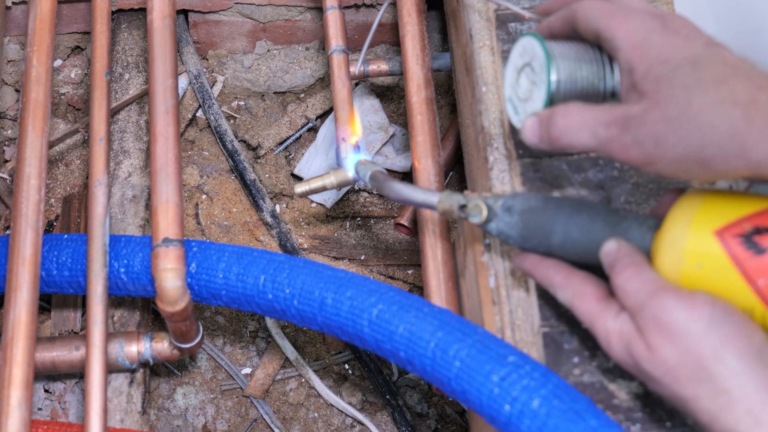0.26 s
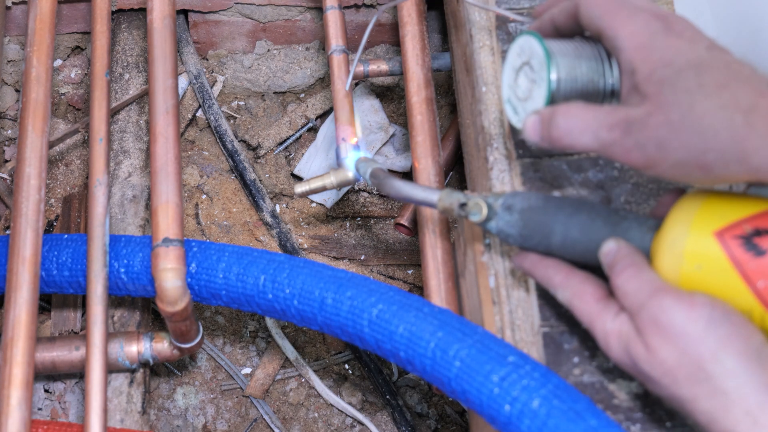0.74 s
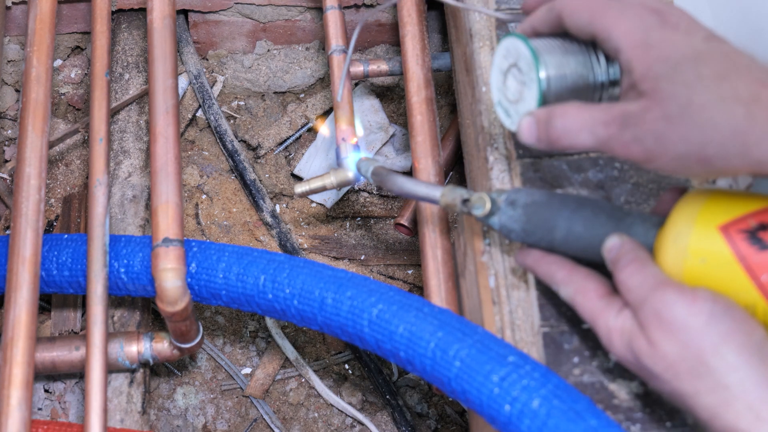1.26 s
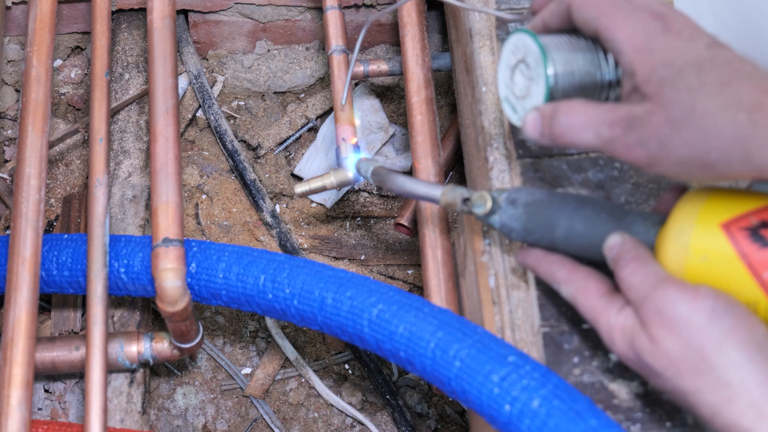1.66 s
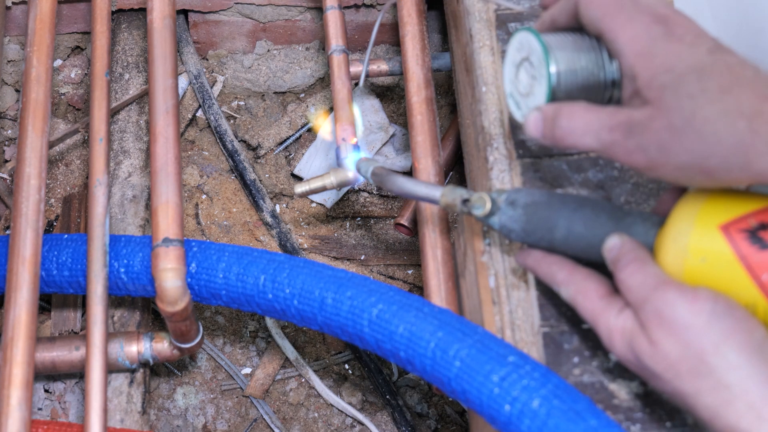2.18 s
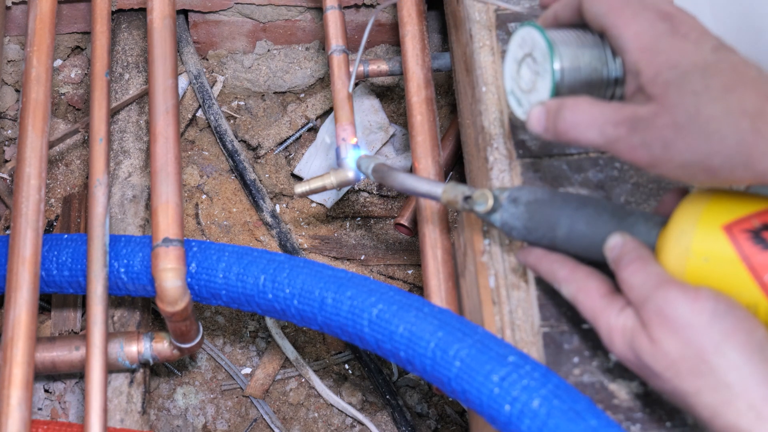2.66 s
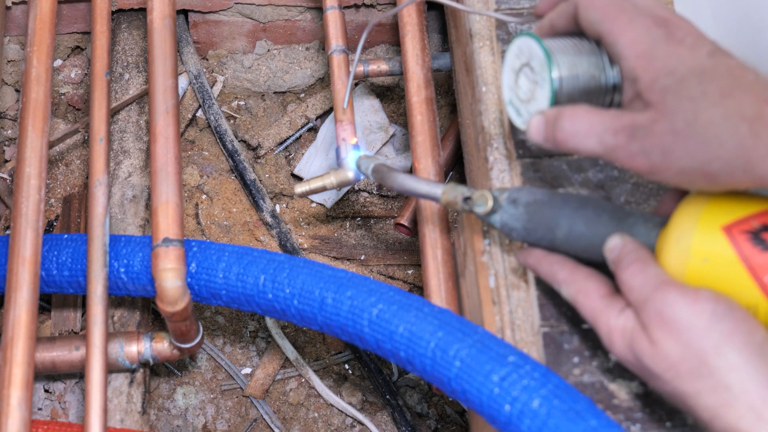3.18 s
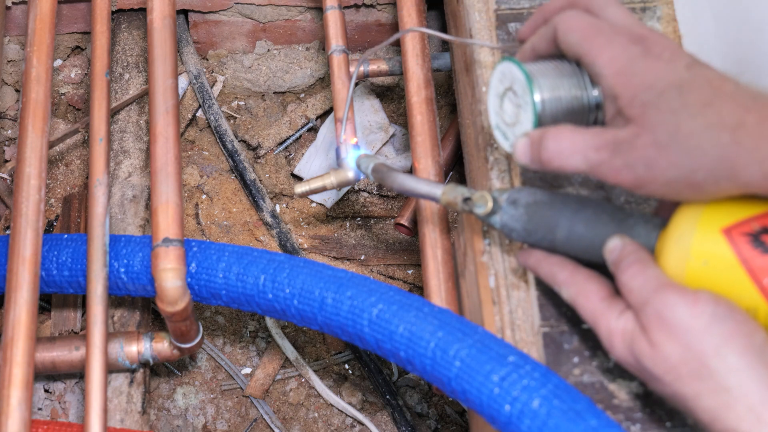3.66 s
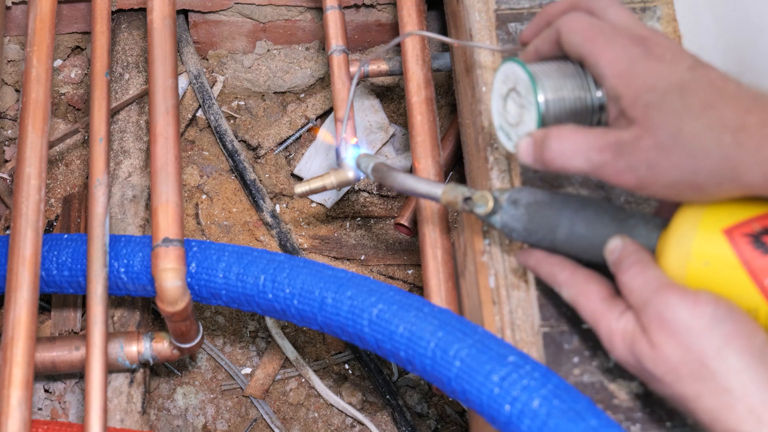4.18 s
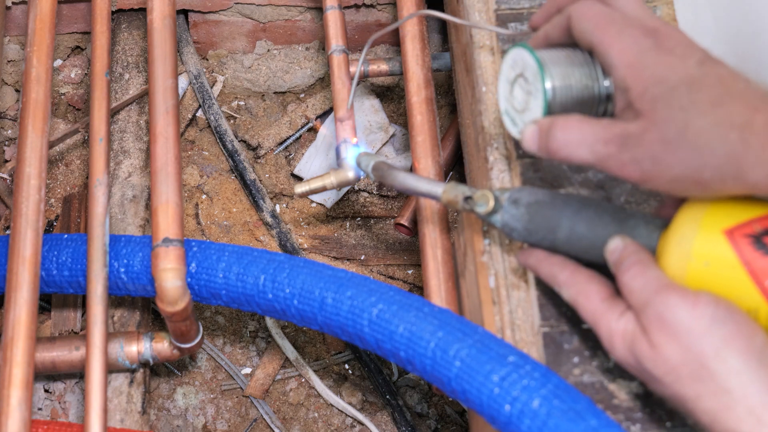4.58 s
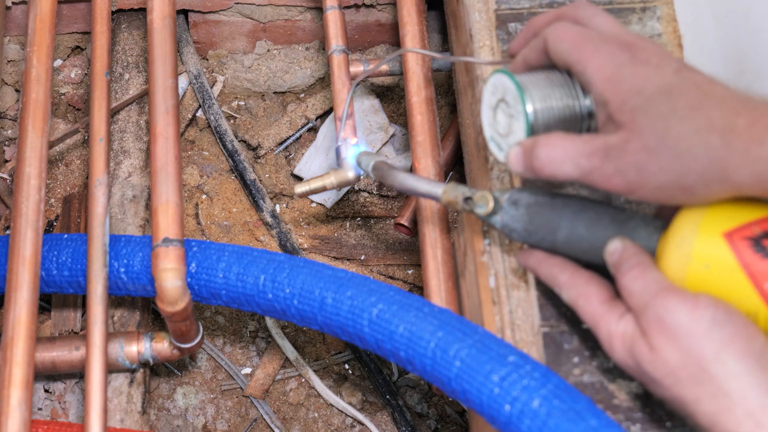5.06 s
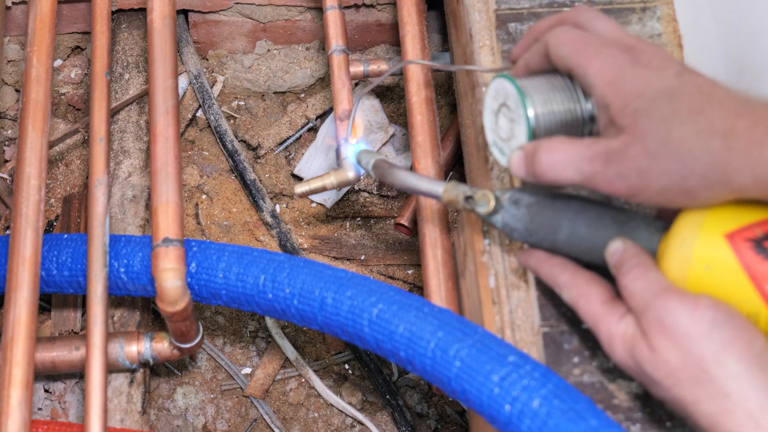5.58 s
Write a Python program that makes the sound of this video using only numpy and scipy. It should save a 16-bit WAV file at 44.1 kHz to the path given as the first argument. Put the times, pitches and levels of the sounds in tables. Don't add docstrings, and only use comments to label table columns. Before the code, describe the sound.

A handheld gas torch roars steadily up close, a breathy hissing burn with a wavering, fluttering whistle-like note buried inside it.

```python
import sys
import numpy as np
from scipy import signal
from scipy.fft import rfft, irfft, next_fast_len
from scipy.io import wavfile
from scipy.ndimage import uniform_filter1d, map_coordinates

SR = 44100
rng = np.random.default_rng(int(sys.argv[2]) if len(sys.argv) > 2 else 0)


def undo_db(level):
    steps = np.asarray(level, float) / 20
    return 10 ** steps


def transcribe(u):
    v = np.clip(np.atleast_2d(u).T, -1, 1)
    q = np.round(v * 32767).astype(np.int16)
    wavfile.write(sys.argv[1], SR, q)


N = 257103


def unit(x):
    return x / np.sqrt(np.mean(x ** 2) + 1e-20)


def along(points, hz):
    point_hz, value = np.transpose(points)
    return np.interp(np.log(hz + 1), np.log(point_hz + 1), value)


def curves(rows):
    time_s, *columns = np.transpose(rows)
    return [np.interp(np.arange(N) / SR, time_s, column) for column in columns]


def bumps(rows, rise_s, fall_s):
    t = np.arange(N) / SR
    total = np.zeros(N)
    for peak_s, size in rows:
        side_s = np.where(t < peak_s, rise_s, fall_s)
        total += size * np.exp(-((t - peak_s) / side_s) ** 2)
    return total


def wobble(rate):
    knots = rng.standard_normal(int(N * 400 / SR))
    position = np.arange(N) * min(rate, 390) / SR
    return unit(map_coordinates(knots, [position]))


def flutter(rate):
    shake = wobble(rate)
    return unit(shake - uniform_filter1d(shake, size=int(0.048 * SR)))


def filtered(x, response):
    m = next_fast_len(N + SR // 2)
    return irfft(rfft(x, m) * response(np.fft.rfftfreq(m, 1 / SR)), m)[:N]


def bands(rows, share=1):
    def response(hz):
        gain = np.ones(len(hz), complex)
        for centre, width, db in rows:
            off = centre ** 2 - hz ** 2
            root = undo_db(share * db / 2)
            gain *= (off + 1j * hz * width * root) / (off + 1j * hz * width / root)
        return gain
    return response


# (frequency [Hz], level [dB])
ROOM_TAIL = [(3000, -40), (5000, -19), (8000, -12), (16000, -12)]


def room(x, t60=0.12):
    t = np.arange(SR // 4) / SR
    tail = rng.standard_normal(len(t)) * undo_db(-60 * t / t60) * (t > .012)
    late = signal.fftconvolve(x, tail / np.linalg.norm(tail))[:N]
    return x + filtered(late, lambda hz: undo_db(along(ROOM_TAIL, hz)))


# (centre [Hz], width [Hz], gain [dB])
CAVITY_ECHOES = [(198, 83, -17.5), (227.7, 124, 15), (412.4, 111, -23), (482.4, 130, 19.5), (491, 484, 7.5),
                 (518.7, 80.5, -17), (627.4, 60.4, 20.5), (648, 90.3, -25), (765, 54, -6.5), (812, 31, 6.5),
                 (892, 60, 6.5), (1017, 24, -6.5), (1056, 22, 6.5), (1124, 65, -6.5), (1194, 28.5, -15.5),
                 (1219.4, 85, 9.5), (1255, 20.4, -11), (1289, 27, 3.5), (1343, 26, 1.4), (1389, 24, -5.5),
                 (1410, 15, 2.5), (1482, 26, -6.5), (1715, 41, -16), (1732, 44, 11.5), (1831, 67, 8),
                 (1943, 109, -25.0), (1962, 102, 17.5),
                 (2134, 107, -13.9), (2177, 130, 20.0), (2235, 110, -19.8), (2413, 60, 7.0),
                    (2688, 67, 5.2), (2819, 56, 4.4), (2890, 80, -7.3), (2929, 191, 11.2),
                    (3059, 117, -11.9), (3342, 44, 6.1), (3581, 27, -8.3), (3682, 164, 20.0),
                    (3732, 220, -18.9), (3870, 31, -6.2), (3952, 37, 5.7), (3999, 35, -6.8),
                    (4140, 45, 6.2), (4283, 57, 6.5), (4459, 95, 8.3), (4638, 216, -25.0),
                    (4702, 288, 18.4), (5033, 62, -10.4), (5156, 67, -10.8), (5266, 613, 15.7),
                    (5318, 96, -16.9), (5612, 326, -11.4), (5970, 51, 5.5), (6023, 116, -18.4),
                    (6060, 411, 14.7), (6273, 52, -7.8),
                 (6694, 534, -15.1), (6855, 387, 11.1), (7125, 87, 6.1), (7445, 108, -5.4),
                 (7539, 266, 9.5), (8164, 102, -6.8), (8190, 233, 4.6), (8522, 172, -7.5), (8752, 64, -5.6),
                 (9135, 100, -9.0), (9397, 900, 15.4), (9566, 555, -19.7), (10096, 159, -8.2),
                 (10569, 204, -11.2), (10756, 900, 17.6), (10983, 662, -19.1), (11134, 195, 10.3),
                 (11421, 111, -3.8), (12092, 239, -8.4), (12104, 108, 10.4), (12331, 102, 3.3),
                 (12648, 63, -7.1), (12876, 293, 11.4), (12982, 306, -11.1), (13441, 120, 4.8),
                 (13725, 275, -6.2), (14052, 49, -3.3), (14670, 614, 20.0), (14766, 442, -17.2),
                 (15449, 172, -4.7)]
# (centre [Hz], width [Hz], gain
# [dB])
NARROW_ECHOES = [(933, 15, -3.4), (1316, 18, -2.8), (1632, 20, -2.8), (1874, 15, -3.1), (2017, 15, 2.9),
                 (2136, 15, -3.5), (2222, 15, -4.3), (2275, 29, -9.3), (2285, 66, 6.9), (2324, 25, -5.1),
                 (2469, 15, -4.6), (2534, 15, -9.9), (2580, 74, 3.5), (2639, 16, -6.1), (3046, 15, -3.1),
                 (3257, 74, 6.1), (3262, 32, -12.7), (3407, 15, -7.3), (3579, 15, -3.3), (3728, 15, -4.9),
                 (3792, 31, -11.6), (3796, 74, 7.3), (3861, 15, -5.1), (4214, 16, -6.1), (4365, 15, -5.2),
                 (4854, 15, -2.5),
                 (5551, 31, -8.0), (5614, 104, 10.0), (5628, 36, -14.0), (5764, 21, -4.7), (6231, 104, 4.0),
               (6390, 20, -8.7), (6638, 25, -5.3), (6938, 40, -6.6), (7003, 98, 6.2), (7039, 44, -8.1),
               (7814, 76, -6.5), (7869, 104, 10.0), (7952, 104, -11.1), (8008, 60, 7.7), (8393, 15, -4.8),
               (8769, 15, -4.9), (8921, 15, -7.3), (9118, 19, -6.1), (9569, 23, -3.9), (9618, 22, 4.1),
               (9698, 27, -3.9), (9890, 15, -6.1), (10169, 80, -8.3), (10203, 102, 8.1), (10304, 44, -4.8),
               (10674, 15, -5.6), (11375, 15, -5.2), (11849, 15, 5.0), (12030, 16, -6.2), (12493, 20, -6.7)]
# (centre [Hz], width [Hz], change [dB])
HAND_ECHOES = [(7600, 140, -0.5), (8366, 110, -3), (8900, 600, 1.5), (9585, 100, 0), (10800, 110, -3),
               (11800, 500, -3), (12087, 200, 4), (13100, 500, 1), (13454, 200, -6), (13592, 85, 4.7),
               (14200, 600, -2.5), (14627, 125, -1), (15300, 500, 0)]
# (time [s], share done [0-1])
HAND_MOVE = [
    (0, 0),
    (3.25, .05),
    (3.55, .95),
    (5.83, 1),
]


def surroundings(x):
    x = filtered(x, bands(CAVITY_ECHOES, 1.0))
    x = filtered(x, bands(NARROW_ECHOES, 1.25))
    done, = curves(HAND_MOVE)
    before = filtered(x, bands(HAND_ECHOES, -.5))
    after = filtered(x, bands(HAND_ECHOES, .6))
    return (1 - done) * before + done * after


# (time [s], roar level [dB], gas jet boost [dB])
FLAME_LEVEL = [
    (0, -21, 0),
    (1, -21, 0.7),
    (2, -21.5, 0),
    (3, -21.5, 0.5),
    (4, -21.5, 1),
    (5, -21.5, 1.5),
    (5.83, -21, 0.5),
]
# (frequency [Hz], level [dB per Hz])
ROAR_COLOUR = [(60, -56), (150, -28.5), (220, -13.5), (400, -17), (750, -12.5), (1000, -2), (1400, 2.5),
               (2200, -7), (2800, -5.5), (3900, -15.5), (6500, -23.5), (9300, -24), (10500, -28),
               (15700, -29)]


def roar():
    roar_db, jet_db = curves(FLAME_LEVEL)
    noise = unit(filtered(rng.standard_normal(N), lambda hz: undo_db(along(ROAR_COLOUR, hz))))
    low = filtered(noise, lambda hz: 1 / (1 + (hz / 1700) ** 4))
    jet = filtered(noise, lambda hz: 1 / (1 + (11000 / (hz + 1)) ** 6))
    middle = noise - low - jet
    flicker_db = 0.033 * wobble(12) + 0.36 * wobble(35) + 0.4 * wobble(110)
    jet_swing_db = jet_db + 0.66 * flicker_db + .8 * flutter(50)
    hiss = middle * undo_db(flicker_db) + jet * undo_db(jet_swing_db)
    return undo_db(roar_db) * (low * undo_db(0.27 * flicker_db) + hiss)


# (time [s], pitch [Hz])
NOTE_DRIFT = [(0, 1299), (0.27, 1279), (0.55, 1330), (1, 1320), (1.4, 1332), (1.8, 1315), (2.3, 1352),
              (2.8, 1316), (3.1, 1330), (3.5, 1292), (4, 1335), (4.25, 1288), (4.55, 1333), (5, 1326),
              (5.83, 1333)]
# (time [s], swell [dB])
GRIP_SWELLS = [(0.047, 3), (0.131, 2.5), (0.247, -4), (0.397, 3.0), (0.507, 3), (0.583, 4), (0.757, -4.5),
               (0.905, 2.6), (1.047, 3), (1.481, 3), (1.527, -3.5), (2.119, -5.5), (2.326, -4.5),
               (2.573, 2.5), (2.659, 4.5), (3.03, -4), (3.421, -5), (3.738, 1), (3.872, -3.5), (4.048, -3),
               (4.075, 4.5), (4.325, 1.5), (4.387, 3.5), (4.554, 3.0), (4.724, 2.5), (4.806, 2.5),
               (4.873, -4.5), (4.942, -3), (5.078, 1), (5.347, -5.5)]
# (time [s], sag [Hz])
NOTE_SAGS = [(0.106, 60.7), (0.265, 99), (0.938, 102.3), (1.087, 66.1), (1.546, 52.95), (2.118, 65.1),
             (2.288, 74.3), (2.706, 57), (3.173, 87.3), (3.367, 53.74), (3.458, 65.06), (3.722, 69.6),
             (4.268, 98.1), (4.362, 62.7), (4.46, 96), (4.77, 124.5), (5.046, 71), (5.136, 61),
             (5.35, 66.87), (5.673, 69.2)]
TUBE_HZ = 1386
NOTE_DB, NOTE_LIFT_HZ, DB_PER_HZ = -22, 28.02, .015
SWELL_S, SWELL_DEPTH, SWELL_HZ_PER_DB = 0.01605, 1.105, 3
SAG_FALL_S, SAG_BACK_S, SAG_DEPTH = .007, .018, 2.0


def song():
    drift_hz, = curves(NOTE_DRIFT)
    swell_db = SWELL_DEPTH * bumps(GRIP_SWELLS, SWELL_S, SWELL_S)
    sag_hz = SAG_DEPTH * bumps(NOTE_SAGS, SAG_FALL_S, SAG_BACK_S)
    slow_hz = drift_hz + NOTE_LIFT_HZ - TUBE_HZ
    off_hz = slow_hz + SWELL_HZ_PER_DB * swell_db - sag_hz + 21 * wobble(45)
    pull = 1 / (1 + (np.minimum(off_hz, 0) / 380) ** 2)
    pitch_hz = TUBE_HZ + off_hz + 27 * wobble(190)
    phase = 2 * np.pi * np.cumsum(pitch_hz) / SR
    swing = pull * (1 + 0.23 * flutter(80) + 0.13 * wobble(200))
    octave = undo_db(-20.0) * swing * np.sin(2 * phase)
    level = undo_db(NOTE_DB + DB_PER_HZ * slow_hz + swell_db)
    return level * swing * np.sqrt(2) * (np.sin(phase) + octave)


def scene():
    torch = roar() + song()
    return room(surroundings(torch))[None]


def roll_off(x):
    return signal.sosfilt(signal.butter(12, 15920, fs=SR, output="sos"), x)


def record(dry):
    mix = filtered(dry[0], lambda hz: hz < 15725)[None]
    return roll_off(mix)


dry = scene()
out = record(dry)
transcribe(out)
```